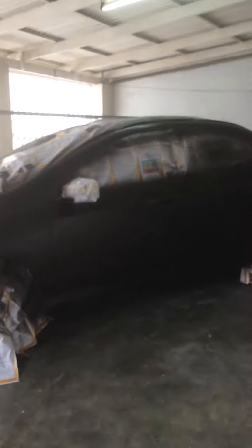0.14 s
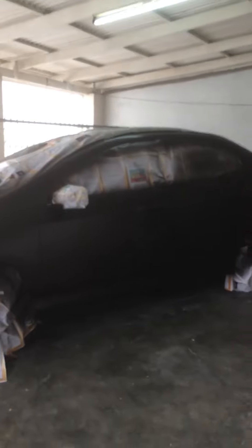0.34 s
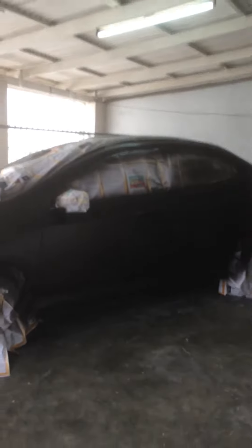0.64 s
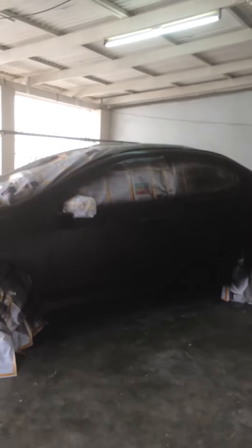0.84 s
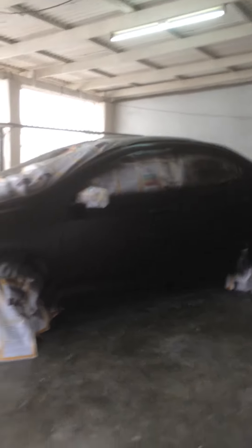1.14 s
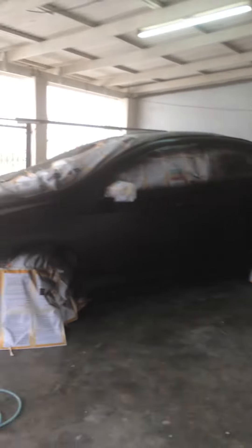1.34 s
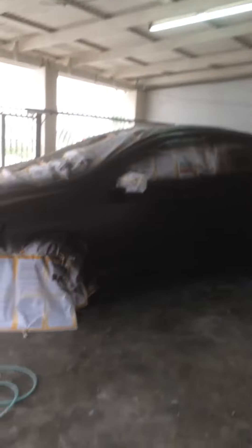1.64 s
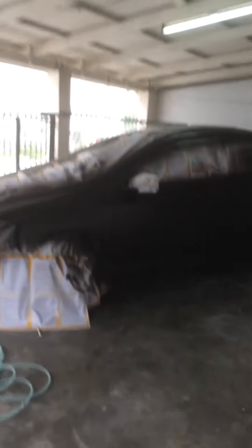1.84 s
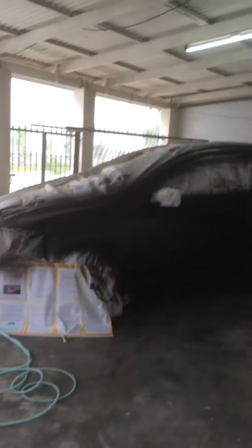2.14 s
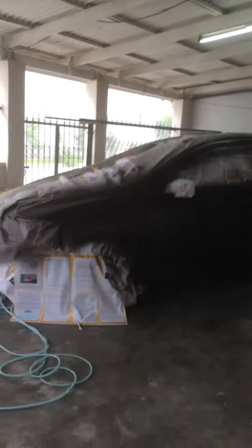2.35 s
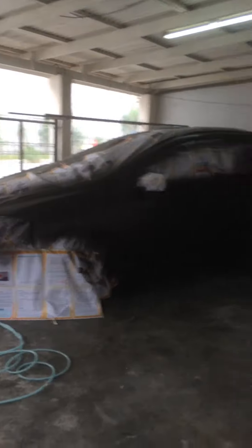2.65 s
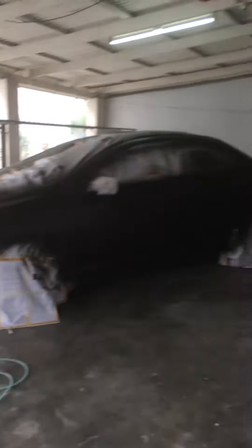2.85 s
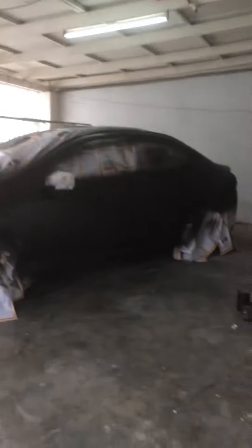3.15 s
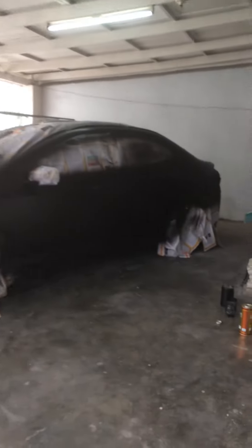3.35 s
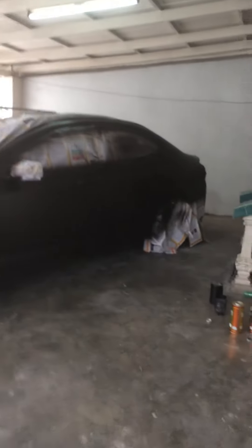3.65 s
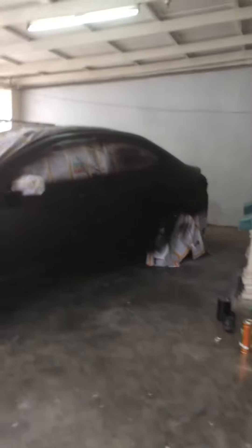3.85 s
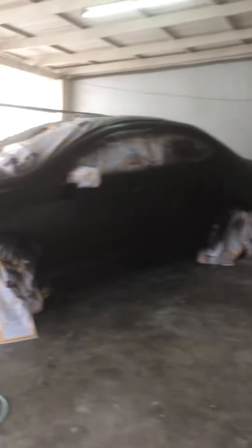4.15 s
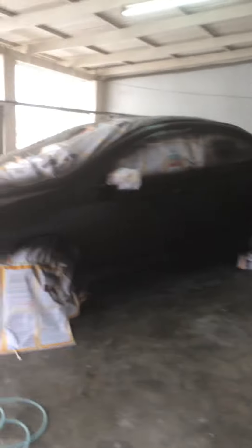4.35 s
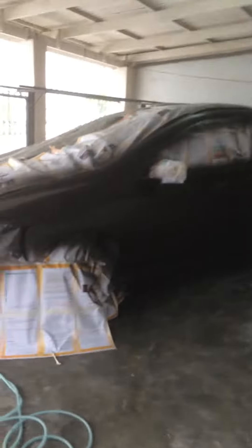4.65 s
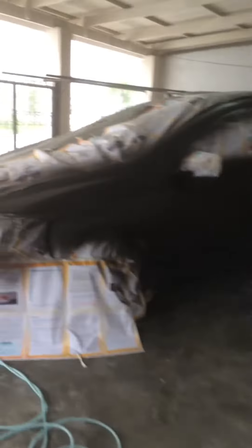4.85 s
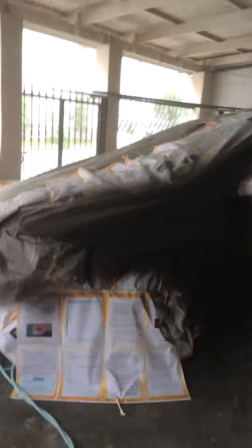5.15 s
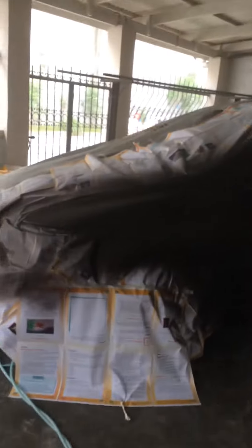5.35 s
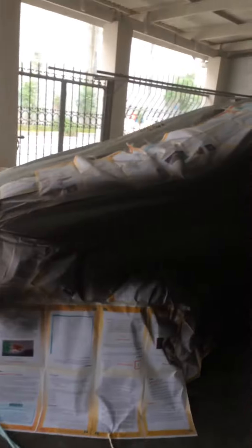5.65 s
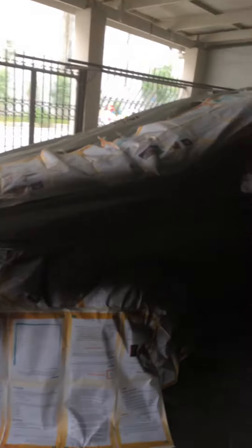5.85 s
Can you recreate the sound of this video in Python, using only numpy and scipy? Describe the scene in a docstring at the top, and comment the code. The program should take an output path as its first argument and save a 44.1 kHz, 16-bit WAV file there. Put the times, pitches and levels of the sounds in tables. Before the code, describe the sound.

A piston air compressor chugs rapidly and steadily in an echoing garage, its low pulsing hum mixed with valve clatter and airy hiss.

```python
"""A belt-driven piston compressor runs in an open garage, heard by a phone that is carried about.
Each turn the intake valve opens and two intake modes hum and beat; valve knocks ring pipe and head and
echo off the walls. The hiss of the valve cavities flares once, near 0.45 s. The hum is faint at first, full
after a second and faint again at the end, while crank-order tones and plate whines swell from spot to spot.
Under it all, shaped noise makes the hiss and fizz of the valves and the roar of the casing."""
import sys
import numpy as np
from scipy import signal
from scipy.fft import rfft, irfft, next_fast_len
from scipy.io import wavfile
from scipy.ndimage import uniform_filter1d, map_coordinates

SR = 44100
rng = np.random.default_rng(int(sys.argv[2]) if len(sys.argv) > 2 else 0)


def bounce(signal):
    """Save signal as a 16-bit WAV file at the path given by the first command-line argument."""
    frames = np.transpose(np.atleast_2d(signal))
    limited = np.clip(frames, -1, 1)
    pcm = np.round(limited * 32767).astype(np.int16)
    wavfile.write(sys.argv[1], SR, pcm)


def natural_amplitude(level_db):
    """Convert a level in decibels to a linear amplitude factor, elementwise."""
    exponent = np.asarray(level_db, float) / 20
    return 10 ** exponent


N = 264159

TURNS = 10.745  # crank turns a second


def unit(x):
    """Normalization: x scaled to rms 1."""
    return x / np.sqrt(np.mean(x ** 2) + 1e-20)


def curves(rows, t):
    """Linear interpolation: each column after the time, read at times t."""
    s, *columns = np.transpose(rows)
    return [np.interp(t, s, column) for column in columns]


def filtered(x, response):
    """Linear filtering: the spectrum of x times a complex response of frequency."""
    size = next_fast_len(len(x) + SR // 2)
    hz = np.fft.rfftfreq(size, 1 / SR)
    return irfft(rfft(x, size) * response(hz), size)[:len(x)]


def coloured(points):
    """Spectral shaping: noise of rms 1 whose spectrum follows (Hz, dB) points on a log frequency axis."""
    f, db = np.transpose(points)
    shape = lambda hz: natural_amplitude(np.interp(np.log(hz + 1), np.log(f + 1), db))
    return unit(filtered(rng.standard_normal(N), shape))


def resonant(x, peaks):
    """Modal superposition: a sum of resonances, each applied twice so that the valleys stay dark."""
    def response(f):
        return sum(natural_amplitude(db) * (1j * f * width / (centre * centre - f * f + 1j * f * width)) ** 2
                   for centre, width, db in peaks)
    return filtered(x, response)


def wobble(rate):
    """Band-limited fluctuation: a smooth random curve, rate knots a second."""
    knots = rng.standard_normal(int(N * rate / SR) + 4)
    return map_coordinates(knots, [np.arange(N) * rate / SR])


def even(x, seconds):
    """Gain levelling: x held at rms 1 over spans of some seconds."""
    size = round(seconds * SR)
    power = uniform_filter1d(uniform_filter1d(x ** 2, size), size)
    return x / np.sqrt(np.abs(power) + 1e-20)


def patchy(x, patchy_db):
    """Turbulent fluctuation: random gain patches some hundred Hz wide and a few hundredths of a second long."""
    z = signal.stft(x, nperseg=512)[2]
    field = uniform_filter1d(uniform_filter1d(rng.standard_normal(z.shape), 8, 0), 6, 1)
    return unit(signal.istft(z * natural_amplitude(patchy_db * unit(field)), nperseg=512)[1][:N])


def crank():
    """Uniform rotation: time in seconds and crank angle in turns (0-1) of every sample."""
    t = np.arange(N) / SR
    return t, t * TURNS % 1


def swell(name, t):
    """Room interference: the rise in dB of one tone or ring at loud and dead spots crossed at times t."""
    # Loud and dead spots. Each row: name of the tone or ring, centre in seconds,
    # half length in seconds, rise in dB (negative at a dead spot).
    spots = [("lasting", .25, 0.25, 7.1), ("lasting", 2.23, .9, 6.5), ("lasting", 3.68, 0.44, 5),
             ("lasting", 5.87, 0.21, 8), ("low thud", 0.0, 0.3, 11), ("low thud", 5.1, 0.48, 8),
             ("low thud", 5.75, .2, 9), ("thud", 0.18, 0.78, 9), ("thud", 2.15, 0.44, 6),
             ("thud", 3.95, 0.61, 5), ("thud", 5, .15, -12), ("2nd mode", 1.65, 0.58, 3.5),
             ("2nd mode", 5.1, .07, -6), ("2nd mode", 5.38, 0.47, 5.8), ("3rd mode", 3.6, .3, -4.5),
             ("3rd mode", 5.76, 0.24, 2.6), ("4th mode", 2.87, 0.64, 2.4), ("4th mode", 4.8, 0.19, 3),
             ("head mode", 0.58, 0.38, 3), ("head mode", 4.93, 0.55, 2.4), ("head mode", 5.74, 0.43, 5.1),
             ("top mode", 1.25, .4, 3.2), ("top mode", 3.7, .2, 4), ("order 9", 4.15, 0.17, 9.8),
             ("order 9", 4.67, 0.21, 9), ("order 9", 5.14, 0.18, 14), ("order 9", 5.72, 0.26, 15.4),
             ("order 12", 0.71, 0.72, 7.7), ("order 12", 2.2, 0.32, -8), ("order 12", 3.5, .6, 3),
             ("order 12", 4.9, 0.44, 3.9), ("order 18", 0.6, 0.47, -7), ("order 18", 1.4, .4, 3.8),
             ("order 18", 2.8, 0.53, 3.3), ("order 18", 5.9, 0.57, -15), ("order 46", 0.0, 0.3, 6.7),
             ("order 46", 1.75, .55, 5), ("order 46", 4.16, 0.29, 9.8), ("order 46", 4.78, 0.24, 13.3),
             ("order 46", 5.53, .3, 12), ("low whine", 0.0, 0.22, 7.6), ("low whine", 0.73, 0.26, 10),
             ("low whine", 1.63, .35, 8.2), ("low whine", 4.35, 0.18, 9.2), ("low whine", 6, 0.88, 7),
             ("high whine", .1, .4, 10.3), ("high whine", 1.0, .25, 6.5), ("high whine", 1.57, .12, 12),
             ("high whine", 3.95, 0.22, 11.3), ("high whine", 4.86, .35, 7), ("high whine", 5.8, .3, 11)]
    return sum(db * np.exp(-((t - s) / half) ** 2) for who, s, half, db in spots if who == name)


def intake():
    """Mode beating: two gated intake modes start opposed over a lasting one, so the hum swells and beats."""
    # The intake hum as the listener moves. Each row: time in seconds, main mode level in dB,
    # upper mode level in dB (both before gate and wobble), start of the hum in turns.
    hum_path = [(0.14, -26, -30, .28), (0.42, -19.5, -29.5, 0.26), (0.98, -19.5, -21, .18),
                (1.26, -16.5, -24, .17), (1.81, -18, -22, .125), (2.65, -18, -24, .12),
                (3.21, -17.5, -26, 0.12), (3.77, -18.5, -25.5, .118), (4.2, -20, -25.5, .15),
                (4.61, -19, -34, 0.19), (5.17, -21, -26.5, 0.23), (5.44, -24, -24.5, 0.3),
                (5.72, -26, -26, 0.29)]
    t, angle = crank()
    stroke_s = t - (angle - .5) / TURNS  # the middle of each turn, so that settings hold for a whole turn
    main_db, upper_db, opens = curves(hum_path, stroke_s)
    late = opens - .2  # turns after a middling start
    # a later start goes with a lower main mode, a higher upper mode and a later shutting
    main_hz = 235.6 - 23 * late
    upper_hz = 262.7 + 45.7 * late
    shuts = .95 + .45 * late  # turns

    opening_s, closing_s, fade_db_per_s = 0.016, .02, 49.5
    since = (angle - opens) / TURNS  # seconds since the valve began to open
    until_shut = (np.minimum(shuts, 1) - angle) / TURNS
    edge = lambda s: np.sin(np.pi / 2 * np.clip(s, 0, 1)) ** 2
    gate = edge(since / opening_s) * edge(until_shut / closing_s)
    gate *= natural_amplitude(-fade_db_per_s * np.abs(since))

    carrier = 22  # the crank order nearest the main mode; the hum stays in step with it wherever it starts
    tone = lambda db, hz: natural_amplitude(db) * np.sin(2 * np.pi * (hz * since + carrier * opens))
    lasting_order, lasting_db = 21, -34.5  # the intake keeps ringing at this order through the whole turn
    lasting = tone(lasting_db + swell("lasting", stroke_s), lasting_order * TURNS)
    hum = gate * (tone(main_db, main_hz) - tone(upper_db, upper_hz)) - lasting
    hum *= natural_amplitude(0.18 * wobble(11))
    # the filter box passes next to nothing above its own modes
    return filtered(hum, lambda hz: 1 / (1 + (hz / 285) ** 16))


def knocks(arrives, t60, alike):
    """Impulse and reverberation: a knock a turn, and its decaying wall echo that changes slowly on the way."""
    turns = np.arange(-4, int(N / SR * TURNS) + 1)
    tail = np.arange(SR // 3)  # samples
    # neighbouring turns share most of their echo
    weight = np.exp(-.5 * ((turns[:, None] - turns) / max(alike, .1)) ** 2)
    weight /= np.linalg.norm(weight, axis=1, keepdims=True)
    echoes = weight @ rng.standard_normal((len(turns), len(tail)))
    echoes *= natural_amplitude(-60 * tail / SR / t60)
    # a second of lead-in holds the knocks before the start
    start = ((turns + np.interp(turns / TURNS, *arrives)) / TURNS * SR).astype(int) + SR
    blows = np.bincount(start, natural_amplitude(0.47 * rng.standard_normal(len(turns))), N + 2 * SR)
    echo = np.bincount((start[:, None] + tail).ravel(), echoes.ravel(), N + 2 * SR)
    return unit(blows[SR:SR + N]), unit(echo[SR:SR + N])


def pipe():
    """Forced resonance: knocks, their echoes and breath noise ring each resonance of pipe and head."""
    # What each knock rings. Each row: resonances (centre in Hz, width of one pass in Hz, level in dB),
    # echo t60 in seconds, turns over which the echo stays alike, breath share of the far power (0-1).
    rings = [([(93, 57, 2)], 0.38, 4.6, 0.28), ([(137, 62, 0)], 0.24, 7.2, 0.55), ([(493.8, 59, 1.5),
             (367, 28.4, -7.5), (398, 36, -17.5), (440, 30, -20.5), (595, 77, -20.5)], 0.51, 4, 0.12),
             ([(744, 45, 0)], 0.71, 3.4, 0.19), ([(991, 49.4, 2), (1029, 29, -1.5)], 0.35, 3.9, 0.4),
             ([(1157.5, 55, -1), (1117.5, 30, -6), (1257.3, 35, -4.5), (1381, 74, -13), (1502, 30, -14.5)],
             1, 3.4, 0.61), ([(1840, 49, -1.5), (1813, 49, -5), (1933, 30, -11)], 0.96, 2.1, 0.81)]
    # How each of these arrives. Each row: name, usual level in dB, arrival of the knock in turns,
    # usual share of power straight from the knock (0-1).
    reach = [("low thud", -46, 0.1007, .2), ("thud", -43.5, .33, .2), ("2nd mode", -39.5, .45, 0.12),
             ("3rd mode", -44.5, .27, 0.2), ("4th mode", -37.5, .95, 0.21), ("head mode", -36, .26, 0.16),
             ("top mode", -46, .78, .1)]
    # Spots where a knock is heard barer. Each row: name, centre in seconds, half length in seconds,
    # extra share straight from the knock (0-1).
    bare = [("low thud", .3, 1.3, .35), ("thud", .3, 1.6, 0.54), ("4th mode", 0.46, .35, 0.24),
            ("head mode", 1.35, 0.82, 0.41), ("2nd mode", 1.53, 1.05, 0.6), ("4th mode", 2.88, .85, 0.65),
            ("2nd mode", 3.1, .5, 0.24), ("2nd mode", 4.07, .3, .35), ("4th mode", 5, .25, 0.3),
            ("low thud", 5.7, 1.2, 0.27), ("thud", 5.0, 1, .35), ("2nd mode", 5.9, 0.45, 0.14)]
    # The knock of the 2nd mode shifts along the way. Each row: time in seconds, shift in turns.
    slides = [(0, -0.11), (1, 0.033), (2, .14), (3.1, 0.27), (4.2, .02), (5.3, -0.27), (5.99, -.32)]
    t = crank()[0]
    s, shift = np.transpose(slides)
    out = np.zeros(N)
    for (name, level_db, angle, near), (peaks, t60, alike, breath) in zip(reach, rings):
        near = near + sum(share * np.exp(-((t - at) / half) ** 4)
                          for who, at, half, share in bare if who == name)
        near, breath = np.clip(near, 0, 1), np.clip(breath, 0, 1)
        arrives = (s, angle + shift * (name == "2nd mode"))
        blow, echo = (resonant(x, peaks) for x in knocks(arrives, t60, alike))
        breathing = resonant(rng.standard_normal(N), peaks)
        far = np.sqrt(1 - breath) * echo + np.sqrt(breath) * breathing
        ring = np.sqrt(near) * unit(blow) + np.sqrt(1 - near) * even(far, 2 / TURNS)
        out += natural_amplitude(level_db + swell(name, t)) * ring
    return out


def drone():
    """Standing waves: crank orders build up between the walls, and swell and fade as the listener crosses."""
    # Steady tones of the room. Each row: name, multiple of the crank rate.
    orders = [("order 9", 9), ("order 12", 12), ("order 18", 18), ("order 46", 46)]
    # Their usual peak levels in dB, one for each order.
    order_db = [-48, -45, -37.5, -44]
    t = crank()[0]
    out = np.zeros(N)
    for (name, order), db in zip(orders, order_db):
        phase = 2 * np.pi * order * TURNS * t + 0.51 * wobble(2.51)
        out += natural_amplitude(db + swell(name, t)) * np.sin(phase)
    return out


def plates():
    """Flow-excited vibration: the valve plates whine, level and phase trembling with the air flow."""
    # The whines. Each row: name, frequency in Hz, usual peak level in dB, phase tremble in radians.
    whines = [("low whine", 1156, -41.5, 1.0), ("high whine", 1846, -52, .9)]
    t = crank()[0]
    out = np.zeros(N)
    for name, hz, db, shake in whines:
        level = natural_amplitude(db + swell(name, t) + 1.7 * wobble(28))
        out += level * np.sin(2 * np.pi * hz * t + shake * wobble(32))
    return out


def air():
    """Turbulent flow noise: hiss coloured by valve cavities, fizz and casing roar swell with each stroke."""
    # Levels along the way. Each row: time in seconds, hiss in dB, fizz relative to the hiss in dB.
    levels = [(0.0, -38.5, -25.5), (0.5, -40, -23), (1.25, -42, -24), (2.62, -42.5, -25),
              (5.34, -40.5, -22.5), (5.99, -40, -22.5)]
    # Spectrum of the hiss. Each row: frequency in Hz, relative density in dB per Hz.
    hiss_spectrum = [(1120, -25.5), (1900, -4.5), (2050, -5), (2700, -13.5), (3000, -7.5), (3210, -10.5),
                     (3800, -12), (4650, -17.5), (7760, -25.5), (9500, -38.5), (12400, -63), (20900, -120)]
    # Spectrum of the fizz. Each row: frequency in Hz, relative density in dB per Hz.
    fizz_spectrum = [(5290, -27), (9000, -3.5), (12900, -13), (15500, -18)]
    # Spectrum of the casing roar. Each row: frequency in Hz, relative density in dB per Hz.
    roar_spectrum = [(15, -60), (28, 9.5), (60, 1.5), (150, 8), (250, 10.5), (320, -2.5), (420, 4),
                     (620, -2.5), (870, 1.5), (1400, 3), (1700, -1.5), (2100, -11.5), (2600, -6),
                     (4000, -57)]
    # Small valve cavities. Each row: centre in Hz, width of one pass in Hz, level in dB.
    cavity_peaks = [(2294, 80, 2), (2570, 53, -7), (2934, 330, 0), (3350, 145, -2), (3680, 240, -3.5),
                    (4280, 270, -10.5)]
    t, angle = crank()
    hiss_db, fizz_db = curves(levels, t)
    stroke = np.cos(2 * np.pi * (angle - .55))
    flare_db = 7.5 * np.exp(-((t - 0.448) / .05) ** 2)  # the valve cavities flare once
    cavities = unit(resonant(rng.standard_normal(N), cavity_peaks))
    jet = coloured(hiss_spectrum) + natural_amplitude(-6 + flare_db + 2.3 * stroke) * cavities
    hiss = natural_amplitude(hiss_db + 0.53 * stroke + 0.4 * wobble(30)) * patchy(jet, patchy_db=1.22)
    fizz = patchy(coloured(fizz_spectrum), patchy_db=1.5)
    fizz *= natural_amplitude(hiss_db + fizz_db + 1.2 * stroke + .9 * wobble(22))
    roar = natural_amplitude(-34.5 + 0.73 * stroke) * patchy(coloured(roar_spectrum), patchy_db=0.6)
    return hiss + fizz + roar


def scene():
    """Superposition: hum, ringing pipe, drone, whines and air add up at one microphone."""
    return (intake() + pipe() + drone() + plates() + air())[None]


def low_pass(x):
    """Removes everything above the highest recorded frequency."""
    return signal.sosfilt(signal.butter(12, 15630, fs=SR, output="sos"), x)


def record(dry):
    """High-pass response: the phone cuts the deep bass below 45 Hz in two first-order steps."""
    thin = filtered(dry[0], lambda hz: (1j * hz / (45 + 1j * hz)) ** 2)
    return low_pass(thin[None])


dry = scene()
out = record(dry)
bounce(out)
```